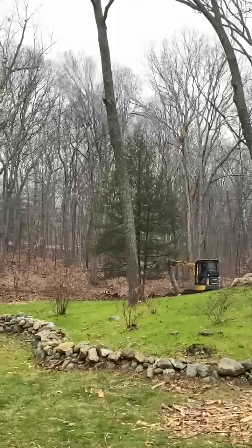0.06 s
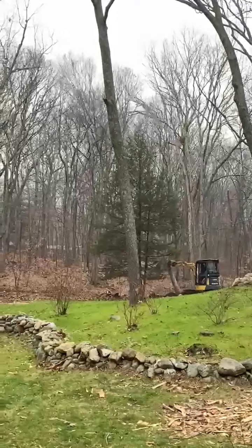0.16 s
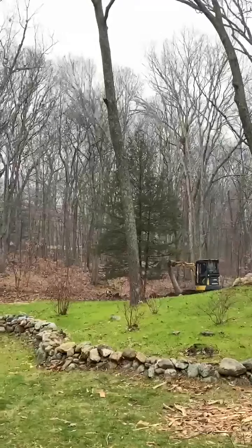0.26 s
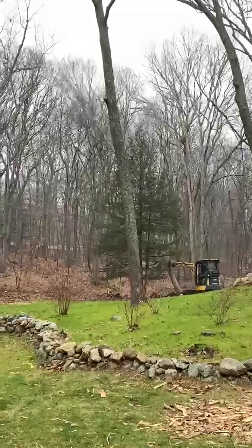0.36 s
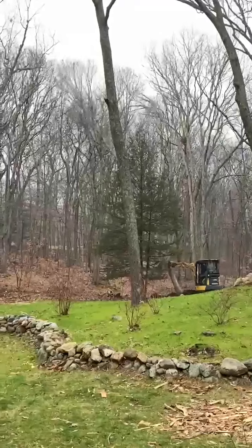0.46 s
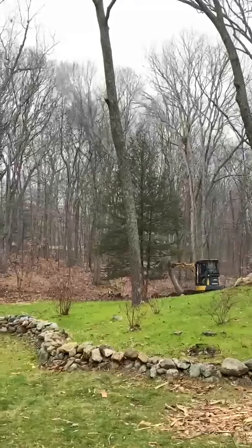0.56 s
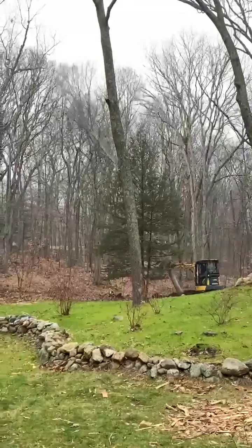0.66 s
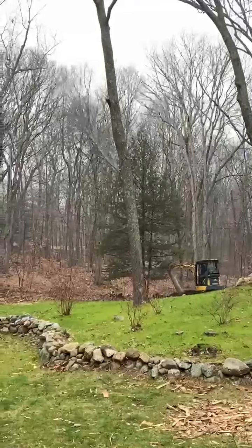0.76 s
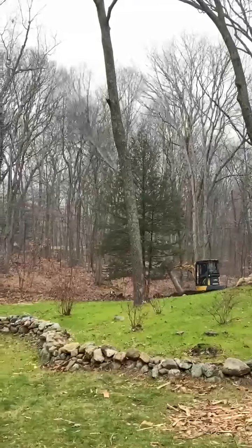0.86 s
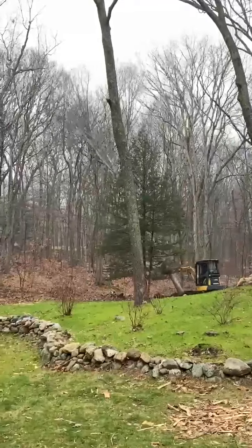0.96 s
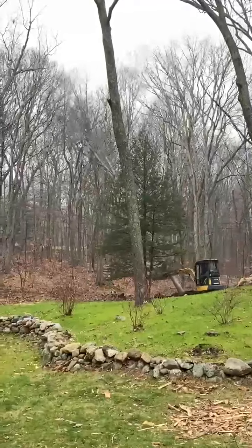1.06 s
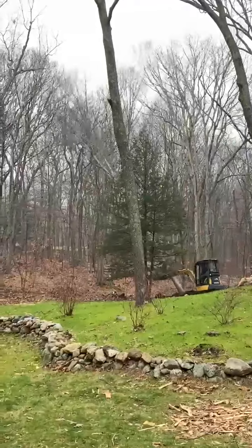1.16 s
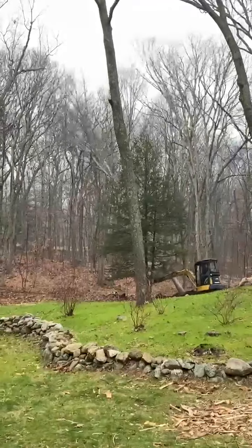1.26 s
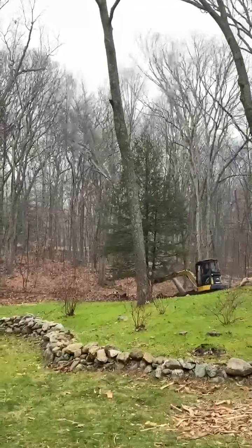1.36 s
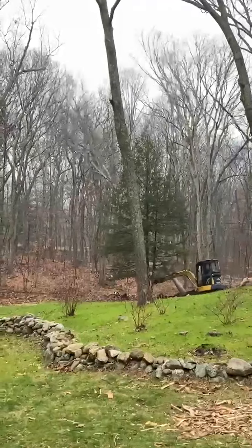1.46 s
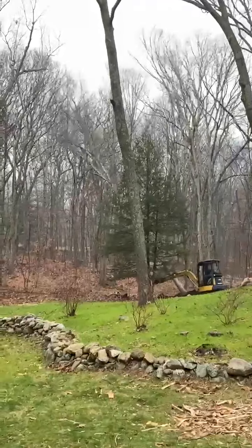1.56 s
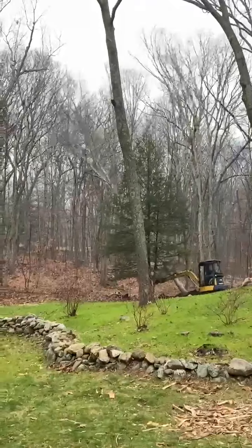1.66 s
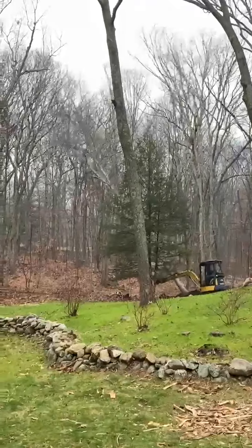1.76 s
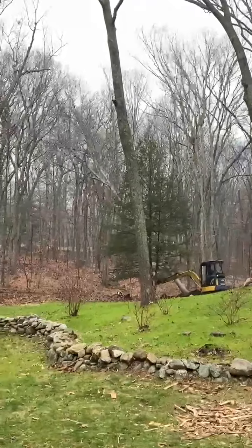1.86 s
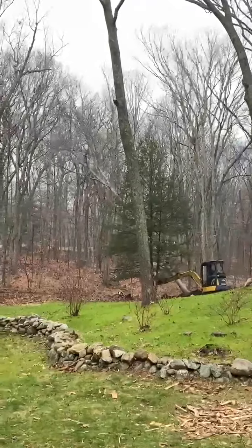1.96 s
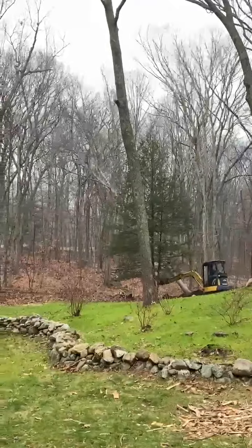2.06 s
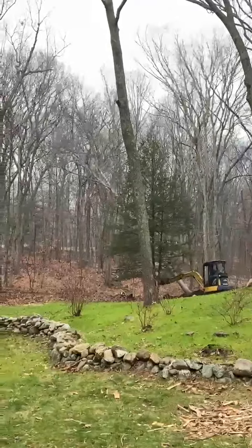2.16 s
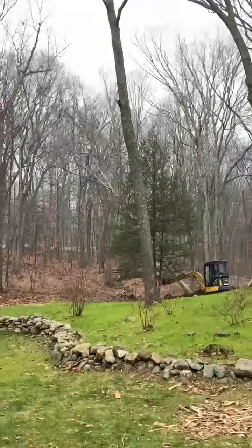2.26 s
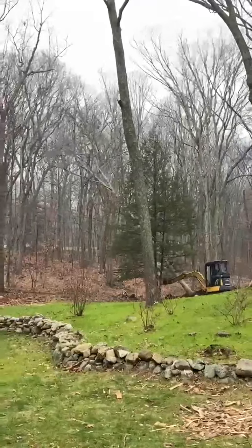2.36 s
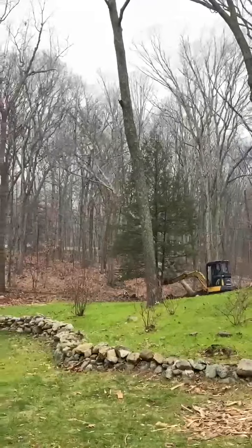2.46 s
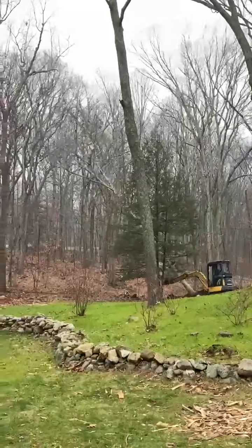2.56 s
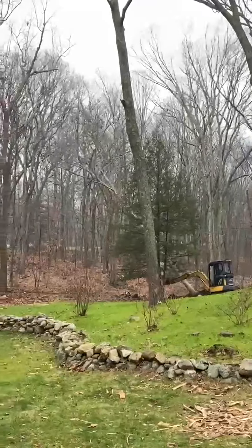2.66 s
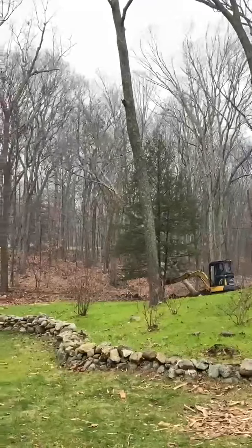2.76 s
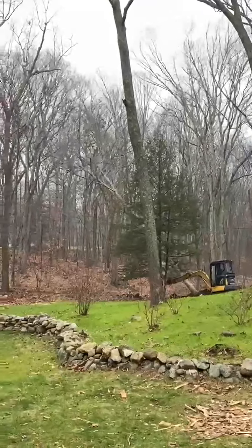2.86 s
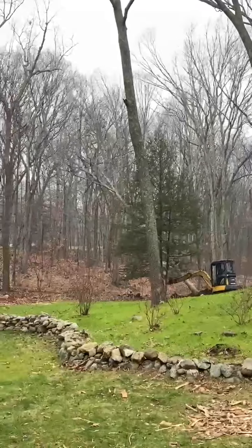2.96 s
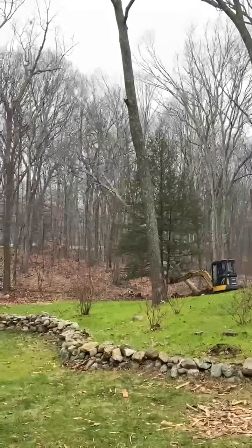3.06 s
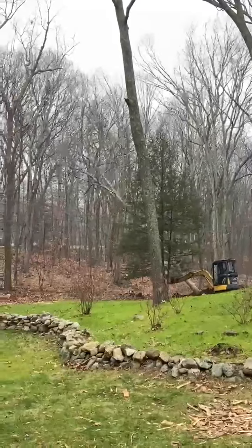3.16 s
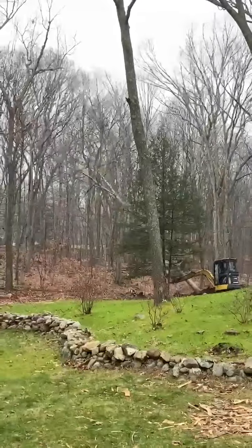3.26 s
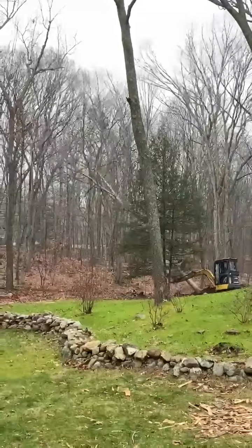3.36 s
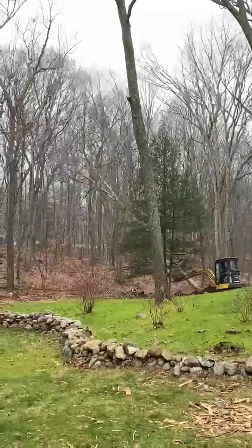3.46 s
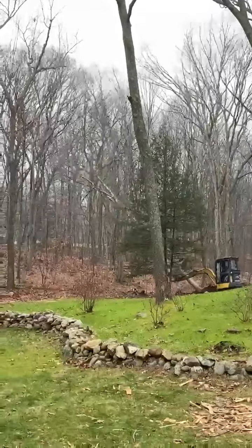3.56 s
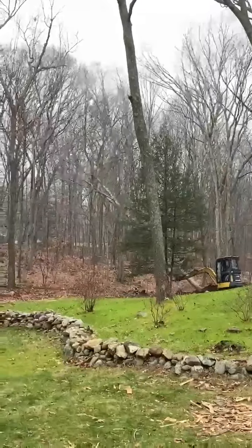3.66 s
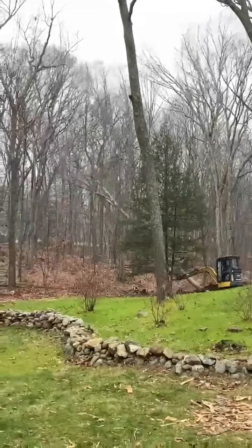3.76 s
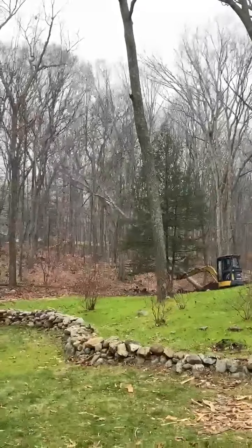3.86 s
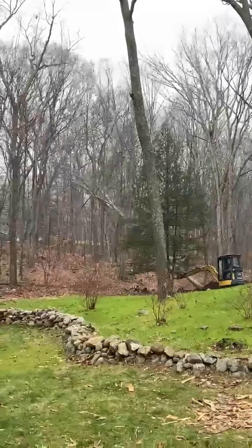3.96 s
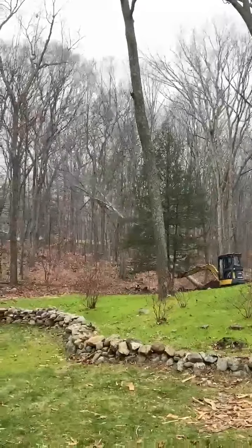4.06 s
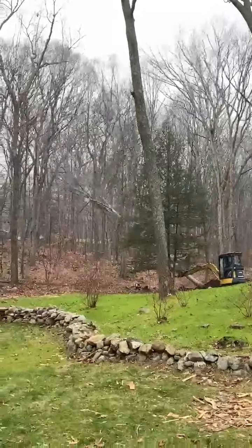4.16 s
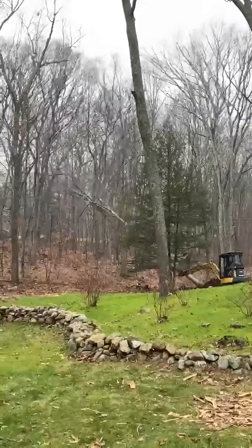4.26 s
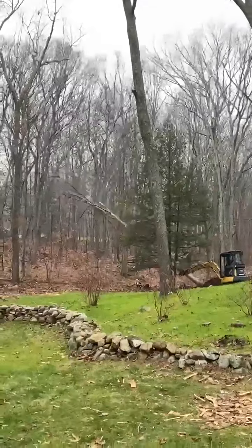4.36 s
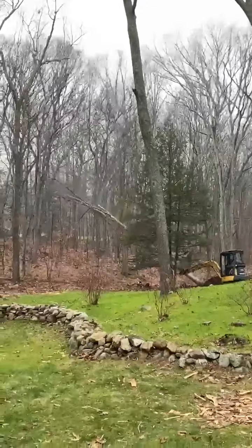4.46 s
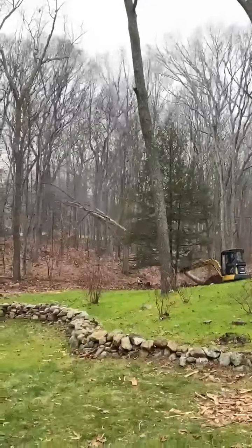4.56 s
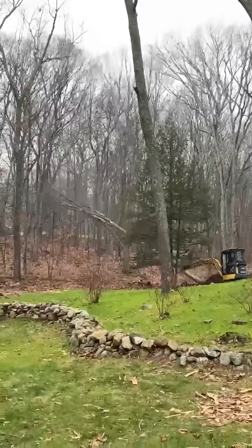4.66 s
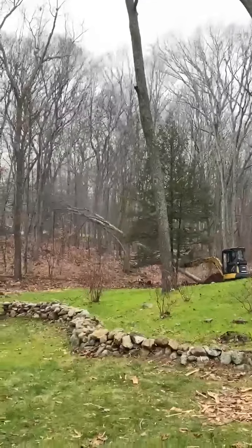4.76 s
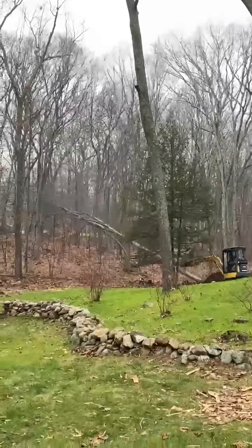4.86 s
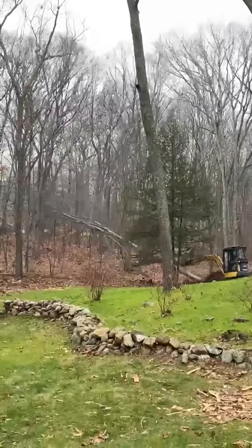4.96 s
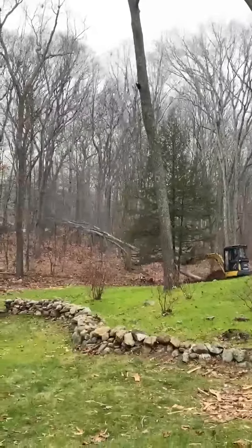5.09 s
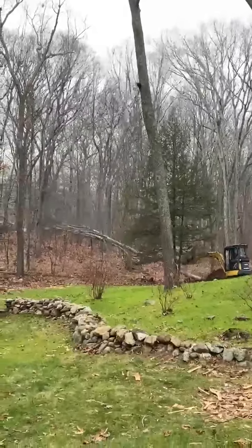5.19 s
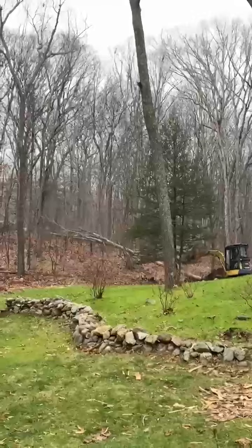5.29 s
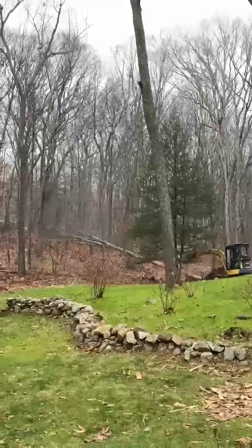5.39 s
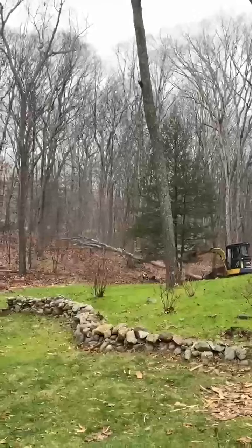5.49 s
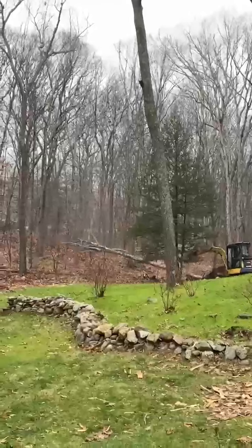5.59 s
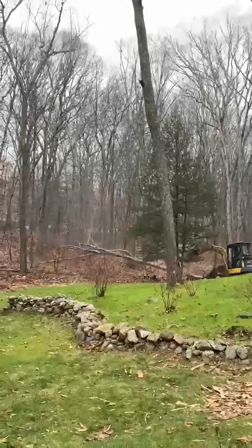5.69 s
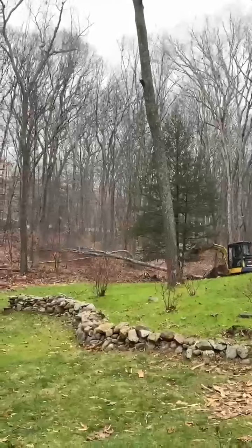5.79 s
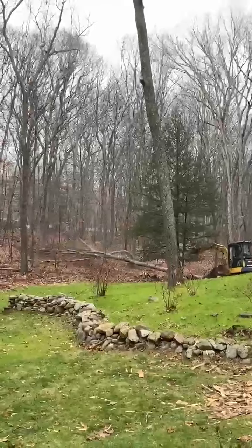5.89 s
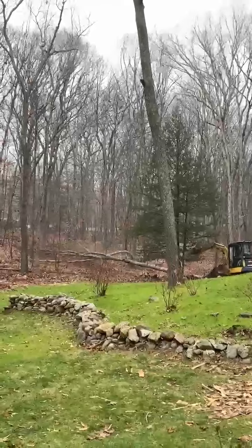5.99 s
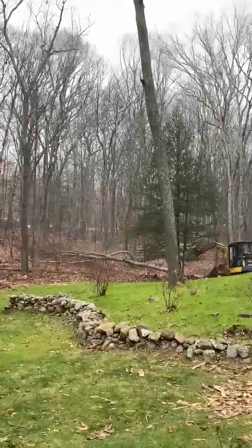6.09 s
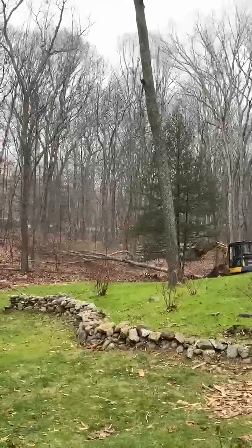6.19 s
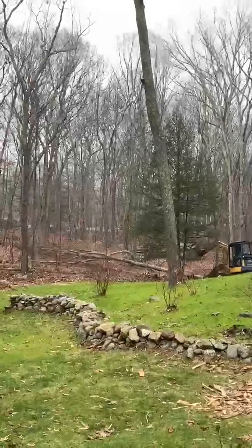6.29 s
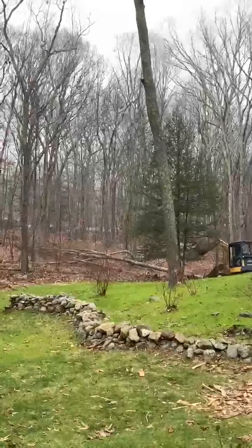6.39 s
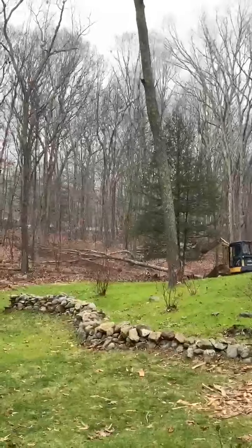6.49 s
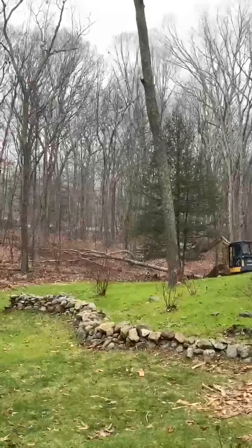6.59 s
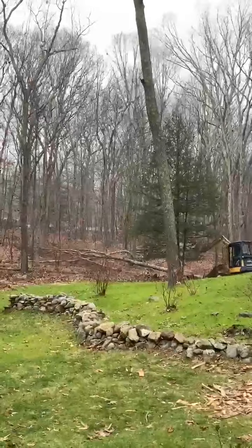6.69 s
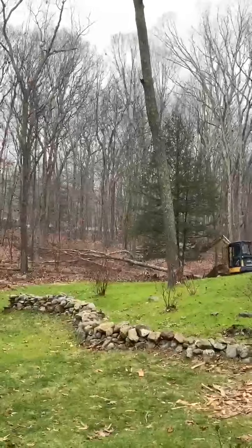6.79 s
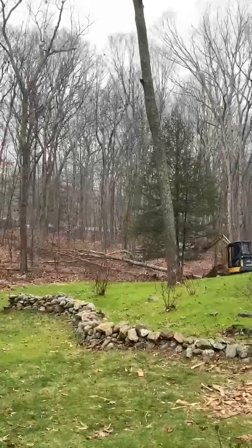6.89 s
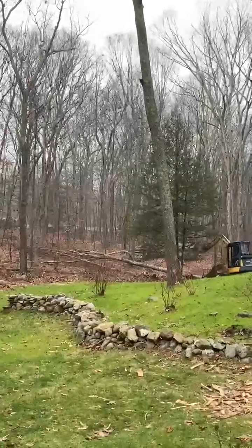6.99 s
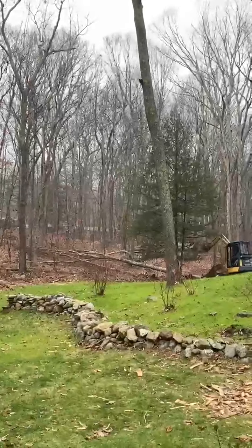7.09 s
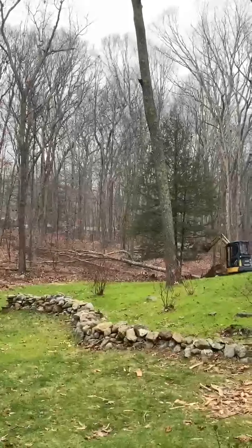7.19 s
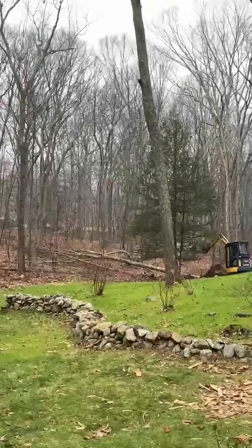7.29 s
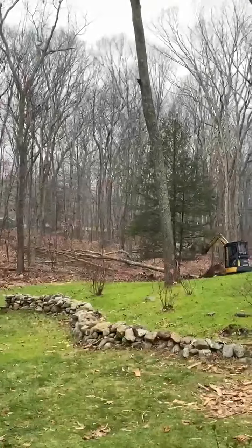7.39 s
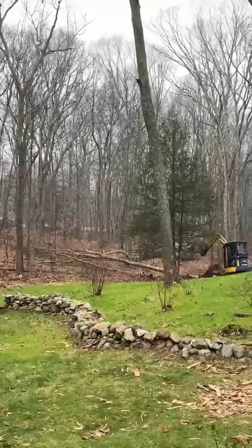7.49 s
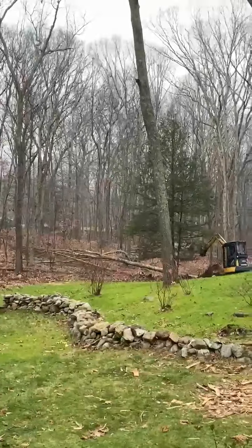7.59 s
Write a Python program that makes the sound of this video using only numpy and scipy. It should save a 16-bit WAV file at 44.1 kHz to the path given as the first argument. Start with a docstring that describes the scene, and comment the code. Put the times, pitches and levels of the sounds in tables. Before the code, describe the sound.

Twigs crackle and soil grinds over a low engine drone, then loud limb snaps and a thudding treefall, ending with a metallic bucket knock.

```python
"""A far-off diesel hums and clatters while twigs crackle, soil grinds and a trunk knocks: an excavator
pushes a tree over at the edge of a wood. Limbs snap, fibres rip, the crown lands with low thuds, then
the bucket knocks. The engine is sines, a looped cycle and pulsed noise; wood is random clicks through
resonances; trunk and bucket are struck modes, thuds are low sines with noise, the valve is narrow hiss.
Trunks scatter the sound, and two closely spaced microphones listen."""
import sys
import numpy as np
from scipy import signal
from scipy.fft import rfft, irfft, next_fast_len
from scipy.io import wavfile

SR = 44100
rng = np.random.default_rng(int(sys.argv[2]) if len(sys.argv) > 2 else 0)


def dump_mix(stems):
    """Bounce the given channels to the path in sys.argv[1] as a 16-bit WAV at rate SR."""
    frames = np.atleast_2d(stems).T  # one column per channel
    limited = np.clip(frames, -1, 1)  # hard clip at full scale
    pcm = np.round(limited * 32767).astype(np.int16)
    wavfile.write(sys.argv[1], SR, pcm)


N = 336924
T = np.arange(N) / SR


def undb(db):
    """Amplitude ratio of a level in dB."""
    return 10 ** (np.asarray(db) / 20)


def unit(x):
    """Scale to rms 1."""
    return x / np.sqrt(np.mean(x ** 2))


def peak(x, db):
    """Scale to a peak level."""
    return x * undb(db) / np.max(np.abs(x))


def curves(table):
    """One value per sample for each column of a control table."""
    time_s, *columns = np.transpose(table)
    return [np.interp(T, time_s, column) for column in columns]


def fade(t, t60):
    """Exponential decay, 60 dB down after t60 seconds."""
    return np.exp(-np.log(1000) * t / t60)


def add(track, start_s, x):
    """Mix x into the track at its start time."""
    i = max(int(start_s * SR), 0)
    track[i:i + len(x)] += x[:N - i]


def colour(x, points):
    """Filter by a spectrum of (Hz, dB) points, joined along log frequency."""
    hz, db = np.transpose(points)
    size = next_fast_len(len(x) + 4096)
    f = np.maximum(np.arange(size // 2 + 1) * SR / size, 1)
    gain = undb(np.interp(np.log(f), np.log(hz), db))
    return irfft(rfft(x, size) * gain, size)[:len(x)]


def resonate(x, hz, q):
    """Two-pole resonance, gain 1 at the centre."""
    b, a = signal.iirpeak(min(hz, SR / 4), max(q, .6), fs=SR)
    return signal.lfilter(b, a, x)


def resonate_twice(x, hz, q):
    """The same resonance twice over, for steeper skirts."""
    return resonate(resonate(x, hz, q), hz, q)


def highpass(x, order, hz):
    """Butterworth low cut."""
    return signal.sosfilt(signal.butter(order, hz, "high", fs=SR, output="sos"), x)


def walk(rate):
    """Slow chance with a spread near 1, joining rate new random values per second."""
    return np.interp(T * rate, np.arange(1024), rng.standard_normal(1024))


def clicks(size, per_s, spread_db):
    """Random clicks of uneven strength and either sign."""
    when, strength = rng.random(size), np.clip(rng.standard_normal(size), -2, 2)
    return (when < per_s / SR) * undb(spread_db * strength) * rng.choice([-1, 1], size)


def struck(modes, t, centre_hz, detune):
    """Modes ringing; each blow favours those near one pitch and tunes them a little differently."""
    chance = rng.standard_normal((len(modes), 2))
    ring = 0
    for (hz, db, t60), (louder, sharper) in zip(modes, chance):
        octaves_away = abs(np.log2(hz / centre_hz))
        gain = undb(db - 13 * octaves_away + 1.5 * louder)
        ring = ring + gain * fade(t, t60) * np.sin(2 * np.pi * hz * (1 + detune * sharper) * t)
    return ring


# engine speed: time_s, firing_rate_hz
ENGINE_SPEED = [(0, 65.03), (1.13, 65.03), (1.38, 68.47), (1.55, 68.77), (1.9, 67.76), (2.17, 69.32),
                (4.3, 68.86), (5.38, 67.68), (5.7, 68.53), (5.9, 66.9), (6.5, 66), (7.64, 66.13)]
# fundamental of the exhaust: time_s, level_db
EXHAUST_HUM = [(0, -37), (1.02, -33.5), (1.33, -41.5), (1.9, -41.5), (2.08, -46), (2.62, -41.5),
               (4.5, -40.5), (5.5, -46.5), (6.12, -35.5), (6.52, -47.5), (7.15, -40), (7.64, -39.5)]
# exhaust overtones; thirds come from unequal cylinders: multiple_of_firing_rate, level_db
EXHAUST_OVERTONES = [(7 / 3, -57), (8 / 3, -65), (3, -59), (11 / 3, -66), (4, -61), (14 / 3, -61), (5, -63),
                     (6, -60), (23 / 3, -65), (26 / 3, -65), (28 / 3, -61), (10, -64), (31 / 3, -66)]
# block and casing of the engine: frequency_hz, gain_db
ENGINE_CASING = [(25, -42), (45, 5), (90, 12), (160, 0.5), (200, -23.5), (260, -1.5), (320, -11.5),
                 (480, -5), (630, -8), (1150, -16.5), (3300, -23), (5500, -27.5), (15000, -42.5)]
# the octave of the exhaust grows as the engine slows
CRUISE_HZ, OCTAVE_DB, OCTAVE_DB_PER_HZ = 67.06, -40.5, 0.47
CLATTER_DB, CLATTER_LOW_HZ = -5, 150
RASP_DB, RASP_DEPTH = -0.5, .6


def excavator():
    """Three cylinders: a clean exhaust hum, clatter that repeats each cycle, a rasp at every firing."""
    firing_hz, = curves(ENGINE_SPEED)
    first_db, = curves(EXHAUST_HUM)
    second_db = OCTAVE_DB + OCTAVE_DB_PER_HZ * (CRUISE_HZ - firing_hz)
    firings = np.cumsum(firing_hz * (1 + 0.0011 * walk(13))) / SR
    angle = 2 * np.pi * firings

    hum = undb(first_db + 0.39 * walk(14)) * np.sin(angle)
    hum += undb(second_db + 0.36 * walk(16)) * np.cos(2 * angle)
    for order, db in EXHAUST_OVERTONES:
        # reflections make each overtone waver in level and phase
        wavering_level = undb(db + 2.8 * walk(5))
        phase = 2 * np.pi * rng.random() + .6 * walk(7)
        hum += wavering_level * np.sin(order * angle + phase)

    # one random waveform, replayed every three firings
    cycle = irfft(np.exp(2j * np.pi * rng.random(size=513)))
    clatter = unit(np.interp(firings / 3 % 1, np.linspace(0, 1, len(cycle)), cycle))
    clatter = highpass(clatter, 6, CLATTER_LOW_HZ) * undb(CLATTER_DB + 2 * walk(9))

    pulsed_noise = unit(rng.standard_normal(N) * (1 + RASP_DEPTH * np.cos(angle)))
    rasp = colour(pulsed_noise, [(100, -2), (300, -4), (700, -3), (1500, 1)])
    casing = unit(colour(clatter + undb(RASP_DB) * rasp, ENGINE_CASING))
    return np.sqrt(2) * hum + undb(-47 + walk(3.6)) * casing


# hydraulic valve: time_s, whistle_level_db, pitch_hz
VALVE_HISS = [(6.4, -89, 9400), (6.78, -78, 9500), (6.96, -70, 10020), (7.07, -76, 10150),
              (7.17, -73, 11700), (7.24, -76, 11200), (7.35, -90, 11300)]
VALVE_WIDTH_HZ, VALVE_BROAD_DB = 240, 2  # spread either side of the pitch; broad hiss over whistle


def hydraulics():
    """Oil squeezes through a valve: thin hiss whose pitch mostly climbs as the boom lifts, over broad hiss."""
    whistle_db, pitch_hz = curves(VALVE_HISS)
    slow_noise = signal.butter(2, VALVE_WIDTH_HZ, fs=SR, output="sos")
    flutter = unit(signal.sosfilt(slow_noise, rng.standard_normal(N)))
    whistle = unit(flutter * np.sin(2 * np.pi * np.cumsum(pitch_hz) / SR))
    broad = unit(resonate_twice(rng.standard_normal(N), 10500, q=3.5))
    return undb(whistle_db) * (whistle + undb(VALVE_BROAD_DB) * broad)


# small knocks around the bucket: start_s, peak_db, favoured_pitch_hz
BUCKET_KNOCKS = [(7.021, -33, 1697), (7.125, -22.5, 1350), (7.161, -36.5, 4000), (7.2339, -37, 1540),
                 (7.586, -40, 1550)]
# modes of the bucket before detuning: pitch_hz, level_db, t60_s
BUCKET_MODES = [(630, -8, .06), (800, 1, .06), (1020, 2, .065), (1290, -3, .05), (1435, 4, .05),
                (1550, -1, .045), (2030, 6, .05), (2350, 0, .045), (2860, -8, .04)]


def bucket():
    """The bucket knocks: a dry contact that chatters for a moment, and a brief, damped ring."""
    out, t = np.zeros(N), T[:SR // 4]
    for start_s, db, hz in BUCKET_KNOCKS:
        chatter = rng.standard_normal(len(t)) * fade(t, .07)
        contact = resonate_twice(chatter, hz, q=.98)
        ring = struck(BUCKET_MODES, t, hz, detune=.008)
        add(out, start_s, peak(peak(ring, 0) + peak(contact, -2), db))
    return out


# how hard the crown drags through its neighbours and, at last, over the ground: time_s, crackle_db
CROWN_DRAG = [(0, -46), (.33, -42), (.85, -46), (1.25, -42), (1.98, -45), (2.22, -40), (2.42, -44.5),
              (2.72, -39.5), (3.65, -41.5), (4.5, -36), (5.2, -41), (5.6, -37.5), (5.72, -35.5),
              (6.04, -30.5), (6.24, -39), (6.6, -48.5), (7.2, -57.5), (7.64, -64)]
# every listed snap shakes down a shower of twigs, set this far from its peak
SHOWER_DB, SHOWER_RISE_S, SHOWER_T60_S = -21, 0.0026, 0.24


def twig_gain():
    """Twigs break as the crown drags, and in a short shower after every listed snap."""
    crown_db, = curves(CROWN_DRAG)
    power, t = undb(crown_db) ** 2, T[:SR]
    shower = (1 - np.exp(-t / SHOWER_RISE_S)) * fade(t, SHOWER_T60_S)
    for start_s, db, *_ in LIMB_SNAPS:
        add(power, start_s, (undb(db + SHOWER_DB) * shower) ** 2)
    return np.sqrt(power)


# roots and heavy wood grinding in the soil: time_s, level_db
SOIL_GRIND = [(0, -41), (.58, -45), (.82, -46.5), (1.3, -44), (1.7, -50.5), (2.2, -46.5), (4.6, -45),
              (5.2, -50), (5.8, -42), (6.3, -49), (7.64, -63)]
# tone of the breaking twigs: frequency_hz, gain_db
TWIG_TONE = [(200, -9.5), (600, -2.5), (1100, 2.5), (2000, -1), (3100, -1.5), (5000, -6), (7000, -10.5),
             (10000, -16.5), (13000, -21.5), (16000, -134)]
# tone of scraping soil and heavy wood: frequency_hz, gain_db
SCRAPE_TONE = [(60, 0.5), (190, 0), (260, 5), (360, 6.5), (520, 1), (750, -3.5), (1200, -5), (3000, -33.5)]


def dragging():
    """Twigs break in flurries over a rustle of dry leaves; soil and heavy wood grind beneath."""
    scrape_db, = curves(SOIL_GRIND)
    twigs, t = 0, T[:SR // 50]
    for hz in np.geomspace(900, 9000, 6):
        # each thickness of twig has its own pitch and its own flurries; undergrowth smears every break
        smear = rng.standard_normal(len(t)) * fade(t, .012)
        breaks = signal.fftconvolve(clicks(N, per_s=170, spread_db=4.2), smear)[:N]
        flurries = undb(2.3 * walk(22))
        twigs = twigs + unit(resonate(breaks, hz, q=1.5)) * np.sqrt(hz) * flurries
    leaves = unit(clicks(N, per_s=9000, spread_db=2))
    crackle = unit(colour(.6 * unit(twigs) + .82 * leaves, TWIG_TONE))
    grind = unit(colour(clicks(N, per_s=1100, spread_db=4.5), SCRAPE_TONE))
    crackle = crackle * twig_gain() * undb(1.1 * walk(25))
    return crackle + grind * undb(scrape_db + 2 * walk(18))


# heavy blows on the ground: start_s, peak_db, pitch_hz, t60_s
GROUND_THUDS = [(2.605, -27, 86, 0.038), (2.789, -23.5, 76.5, 0.054), (5.678, -25.5, 94, 0.18),
                (5.926, -24.5, 94, 0.27), (6.002, -16.5, 98.6, 0.13), (6.101, -32, 85.2, 0.2),
                (6.354, -24.5, 147, 0.032), (6.44, -27.5, 99.6, 0.18)]


def ground():
    """Soft earth takes the weight: a few low cycles that swell and die, with a short rumble."""
    out, t = np.zeros(N), T[:SR // 2]
    for start_s, db, hz, t60 in GROUND_THUDS:
        swell = (1 - np.exp(-t / .03)) ** 2 * fade(t, t60)
        rumble = unit(resonate_twice(rng.standard_normal(len(t)), 0.96 * hz, q=1.2))
        thud = swell * (np.sin(2 * np.pi * hz * t) + 0.7 * rumble)
        add(out, start_s, peak(thud, db))
    return out


# trunk and roots giving way, and heavy limbs knocking as the crown lands: start_s, peak_db, favoured_pitch_hz
TRUNK_KNOCKS = [(.006, -29.5, 360), (.186, -31, 302), (.207, -32, 302), (0.275, -33, 370), (.318, -22, 414),
                (.324, -25.5, 596), (.478, -30, 366), (.54, -31.5, 365), (.636, -29, 580),
                (1.282, -25.5, 780), (2.578, -12.5, 790), (2.581, -11.5, 241), (2.608, -26, 760),
                (2.721, -21, 352), (3.042, -23.5, 315), (3.125, -26, 290), (3.137, -24, 775),
                (3.242, -22, 275), (3.248, -21, 654), (4.596, -26, 367), (5.403, -28.5, 443),
                (5.685, -25.5, 557), (6.013, -27, 724), (6.137, -42, 730)]
# modes of the trunk before detuning: pitch_hz, level_db, t60_s
TRUNK_MODES = [(237, -2, .085), (272, 7.5, .085), (312, 1, .06), (365, 4.5, .06), (490, 5, .045),
               (615, 4, .06), (700, 1, .05), (780, 2.5, .055)]


def trunk():
    """Thick fibres tear in a quick run of slips that ring the trunk; it radiates little bass."""
    out, t = np.zeros(N), T[:SR // 4]
    for start_s, db, hz in TRUNK_KNOCKS:
        slips = clicks(len(t), per_s=1500, spread_db=2) * fade(t, .07)
        slips *= .5 / np.linalg.norm(slips)
        slips[0] = 1  # the first slip
        ring = signal.fftconvolve(struck(TRUNK_MODES, t, hz, detune=.035), slips)
        add(out, start_s, peak(highpass(ring, 6, 210), db))
    return out


# bundles of fibres ripping apart: start_s, hold_s, rms_db (before dying away), centre_hz, t60_s
FIBRE_RIPS = [(2.528, 0.1, -35, 2830, 0.18), (2.531, 0.1, -31, 745, 0.66), (3.956, 0.011, -25, 2400, 0.15),
              (4.316, 0.029, -44, 1470, 0.18)]


def ripping():
    """Many fibres part in quick flurries, then the tear runs out."""
    out, t = np.zeros(N), T[:SR // 2]
    for start_s, hold_s, db, hz, t60 in FIBRE_RIPS:
        fibres = clicks(len(t), per_s=1400, spread_db=4) * undb(2 * walk(110)[:len(t)])
        tear = unit(resonate_twice(fibres, hz, q=.7))
        add(out, start_s, undb(db) * tear * fade(np.maximum(t - hold_s, 0), t60))
    return out


# thin branches break at random, louder the harder the crown drags
BRANCHES_PER_S, BRANCH_OVER_CROWN_DB, BRANCH_SCATTER_DB = 6, 7.5, 2
BRANCH_HZ, BRANCH_SCATTER_OCTAVES = 2420, 0.92
BRANCH_RING_DB, BRANCH_CRACK_DB, BRANCH_SPLINTER_DB = -4, -5, -2
# extra breaks while the crackle is above the landing level; none at or below the still level
LANDING_BRANCHES_PER_S, LANDING_CROWN_DB, STILL_CROWN_DB = 55, -36, -47


def branches():
    """Small snaps at random while the crown moves, thickest as it lands, as rows like the limbs'."""
    crown_db, = curves(CROWN_DRAG)
    per_s = BRANCHES_PER_S + LANDING_BRANCHES_PER_S * (crown_db > LANDING_CROWN_DB)
    breaking = (rng.random(N) < per_s / SR) & (crown_db > STILL_CROWN_DB)
    louder, higher = np.clip(rng.standard_normal((2, N)), -1.3, 1.3)
    db = crown_db + BRANCH_OVER_CROWN_DB + BRANCH_SCATTER_DB * louder
    hz = BRANCH_HZ * 2 ** (BRANCH_SCATTER_OCTAVES * higher)
    return [(T[i], db[i], hz[i], BRANCH_RING_DB, BRANCH_CRACK_DB, BRANCH_SPLINTER_DB)
            for i in np.flatnonzero(breaking)]


# limbs snapping: start_s, peak_db, pitch_hz, ring_db and crack_db (peaks against the body's),
# splinter_db (relative drive of the splintering)
LIMB_SNAPS = [(.538, -29, 5470, 0, -15, 11), (.707, -34, 4560, 8, -15, 3), (.791, -28.5, 2600, 4, -18, 0.5),
              (1.061, -26, 1560, -23, -16, 4), (1.095, -25, 1700, -8, -13, 0),
              (1.267, -31, 5000, -8, -4, 2), (1.285, -22, 1680, -19, -14, 7),
              (1.384, -32, 4000, 0, -15, -8), (1.51, -25.5, 3840, -3, -15, 17),
              (2.09, -23, 2930, 11, -16, -7), (2.227, -22.5, 2820, 9, -22, 6),
              (2.466, -25.5, 1680, -23, -15, 3), (2.5256, -13, 2760, -10, -4.5, 13),
              (2.531, -14.5, 1500, -9, -4, -5), (2.5345, -12.5, 1400, -6, -14, 5),
              (2.545, -23, 2000, -13, -10, -4), (2.554, -15, 3050, 3, -12, -2),
              (2.563, -17.5, 3200, -3, -12, -6), (2.577, -12.5, 2870, -8, -3, 4),
              (2.603, -25, 3600, -3, -11, -6), (2.610, -20, 2700, -2, -11, -6),
              (2.623, -19, 2800, -2, -14, -4), (2.6265, -15.5, 2510, 8, -13, -5),
              (2.637, -17.5, 2780, 9, -10, -4), (2.696, -24, 2200, 0, -18, -6),
              (2.889, -29.5, 6010, -13, 0, 9), (3.05, -23, 1460, -25, -19, 3),
              (3.1345, -21, 2370, -6, -4, 4), (3.2447, -15, 3610, -19, -5, -6),
              (3.2472, -18.5, 2900, 3, -12, -12), (3.362, -21.5, 2330, 11, -12, -2),
              (3.426, -17.5, 2086, -21, -16, 6), (3.447, -25, 2700, -8, -8, -1),
              (3.474, -25, 4940, -10, -5, 2), (3.806, -16, 2303, -7, -13, -1),
              (3.9517, -6, 3400, -15.5, 1, -6), (3.955, -23, 3580, 0, -8, 4),
              (4.3084, -9.5, 1580, -2.5, 2.5, -5), (4.345, -23, 1596, -9, -15, 0),
              (4.533, -21, 1320, -18, -2, 4), (4.574, -15.5, 3800, -20, -3, 11),
              (4.656, -23, 2480, -8, -13, 1), (4.7, -18.5, 3985, -14, 4, 12),
              (4.759, -20, 2900, 6, -18, -4), (5.036, -20.5, 2250, -3, -16, 6),
              (5.358, -15.5, 1432, -2, -10, -11), (5.423, -21, 2330, -0.5, -15, 2),
              (5.442, -22, 4900, 1, -6, 3), (5.492, -23, 1700, -8, -12, -13),
              (5.5011, -17, 1590, 1, -9, -7), (5.5126, -8.5, 1130, -5, -26, -15),
              (5.549, -18, 1140, -5, -16, -1), (5.6367, -12.5, 1800, -9, 4, -9),
              (5.658, -9.5, 1090, -9, -1, -15), (5.684, -9.5, 1250, -10, -6, -4),
              (5.714, -17, 1240, -8, -12, -9), (5.726, -17.5, 3320, -2, -14, 5.5),
              (5.770, -9, 1840, -19, -6, -12), (5.7811, -12.5, 1600, -17, -4, -12),
              (5.803, -24, 4300, -6, -8, 1), (5.83, -25, 6000, -10, -5, -3),
              (5.902, -20.5, 2600, -10, 1, 8), (5.991, -14.5, 1980, -12, -16, -2),
              (6.003, -14, 1970, -14, -18, 13), (6.013, -16, 1210, -12, -2, -1),
              (6.049, -22, 1490, -6, 6, 7), (6.1105, -15.5, 2480, -6, 1, -12),
              (6.137, -26, 3400, 6, -12, -4), (6.15, -32, 2200, -10, -8, -2),
              (6.184, -20, 2642, -6, -16, 10), (6.202, -26, 2000, -15, -4, -8),
              (6.353, -18.5, 2040, -19, 1, 14), (6.389, -17.5, 1310, -14, -9, 0),
              (6.723, -35.5, 1590, 13, -22, 9)]
SNAP_RING_Q, SNAP_CRACK_HZ, CRACK_T60_S = 6, 4200, .008
SNAP_HOLLOW_HZ, SNAP_HOLLOW_DB = 807, 2.5
FIBRE_T60_S, SPLINTER_T60_S, SPLINTERS_PER_S = .012, .087, 1500


def snaps():
    """A limb breaks with a bright crack and a run of fibres, rings at its own note, and splinters."""
    out, t = np.zeros(N), T[:SR // 4]
    for start_s, db, hz, ring_db, crack_db, splinter_db in list(LIMB_SNAPS) + branches():
        fibres = clicks(len(t), per_s=14000, spread_db=1) * fade(t, FIBRE_T60_S)
        dying = fade(t, SPLINTER_T60_S) + .15 * fade(t, .2)
        splinters = clicks(len(t), per_s=SPLINTERS_PER_S, spread_db=3.5) * dying
        force = 1.4 * fibres / np.linalg.norm(fibres)
        force += 1.2 * undb(splinter_db) * splinters / np.linalg.norm(splinters)
        force[0] = .8  # the break itself

        broad = resonate(force, hz, q=.9)
        # the limb itself adds a hollow note under the crack
        hollow = resonate_twice(force, SNAP_HOLLOW_HZ, q=1.1)
        body = resonate(broad, hz, q=1.0) + .5 * broad + undb(SNAP_HOLLOW_DB) * hollow
        ring = resonate(broad, hz, q=SNAP_RING_Q)
        # the bright crack is over within a few milliseconds
        split = clicks(len(t), per_s=14000, spread_db=2) * fade(t, CRACK_T60_S)
        crack = resonate_twice(split, SNAP_CRACK_HZ, q=0.94)
        snap = peak(body, 0) + peak(ring, ring_db) + peak(crack, crack_db)
        add(out, start_s, peak(snap, db))
    return out


def woodland(x, t60):
    """Echoes from many trunks, thin and fading."""
    t = T[:SR]
    swell = 1 - np.exp(-t / .012)
    echoes = clicks(len(t), per_s=6000, spread_db=2) * fade(t, t60) * swell
    return signal.fftconvolve(x, echoes / np.linalg.norm(echoes))[:N]


# sound of the blows scattered back by the wood: frequency_hz, gain_db
WOOD_ECHO = [(60, -45), (250, -13), (800, -3.5), (1500, -8.5), (3000, -8), (7000, -15), (12000, -12)]
# scattered sound that differs between the sides: frequency_hz, gain_db
SIDE_ECHO = [(60, -70), (250, -27.5), (550, -10), (1100, -14), (2200, -20), (4500, -41), (7300, -62),
             (10000, -16), (13000, -29)]


def scene():
    """All sources lie in one direction; only the scattered sound differs a little between the sides."""
    blows = snaps() + ripping() + trunk() + bucket()
    direct = excavator() + hydraulics() + dragging() + ground() + blows
    mid = direct + colour(woodland(blows, t60=.8), WOOD_ECHO)
    side = colour(woodland(direct, t60=0.29), SIDE_ECHO)
    return np.array([mid + side, mid - side])


# microphone pair: frequency_hz, left_lead_rad, left_minus_right_db
MICROPHONES = [(30, 0, 0), (200, 0, 0), (380, 0, -.5), (750, .4, 2), (1300, .35, 2), (2000, .2, 0),
               (2550, .6, 0), (3400, 0, 0), (4400, .7, 0), (5050, .4, 0), (6000, 1.6, 0), (7300, 3.1, 0),
               (10400, 6.3, 0), (16400, 12.6, 0)]
BOTTOM_HZ, TOP_HZ = 36, 15400


def record(dry):
    """The two microphones drift apart in phase towards the treble; deepest bass and top are cut."""
    hz, lead_rad, balance_db = np.transpose(MICROPHONES)
    size = next_fast_len(N + 4096)
    f = np.arange(size // 2 + 1) * SR / size
    # each side takes half of the level and phase difference
    half = undb(np.interp(f, hz, balance_db) / 2) * np.exp(.5j * np.interp(f, hz, lead_rad))
    pair = irfft(rfft(dry, size) * np.array([half, 1 / half]), size)[:, :N]
    pair = highpass(pair, 3, BOTTOM_HZ)
    return signal.sosfilt(signal.ellip(8, .2, 70, TOP_HZ, fs=SR, output="sos"), pair)


dry = scene()
out = record(dry)
dump_mix(out)
```